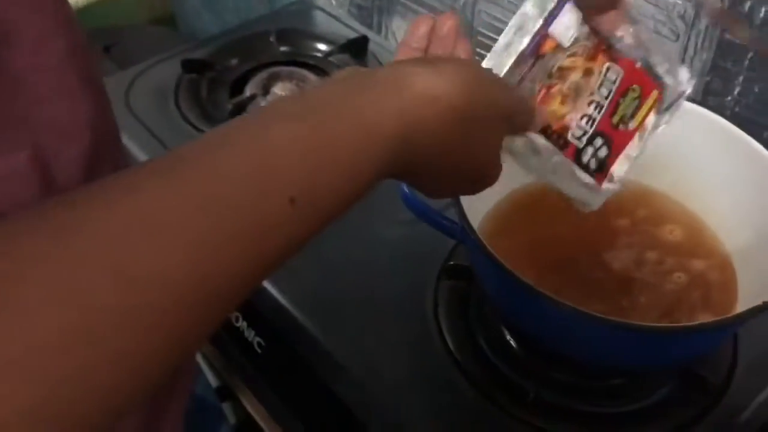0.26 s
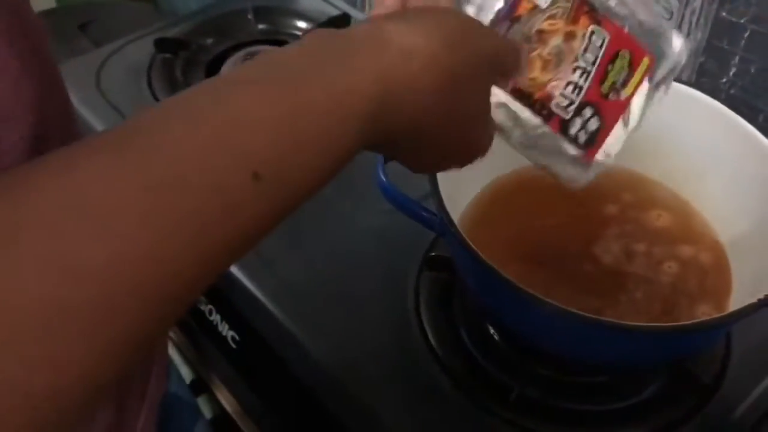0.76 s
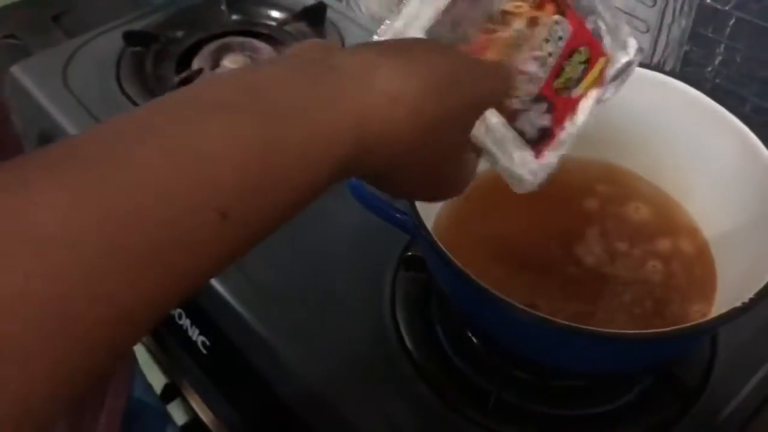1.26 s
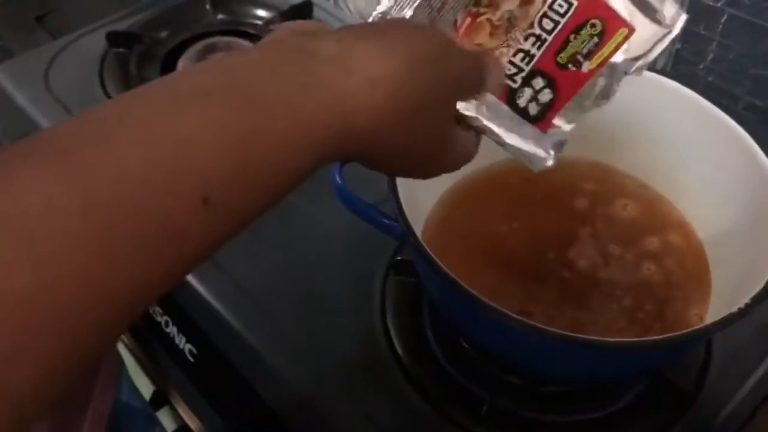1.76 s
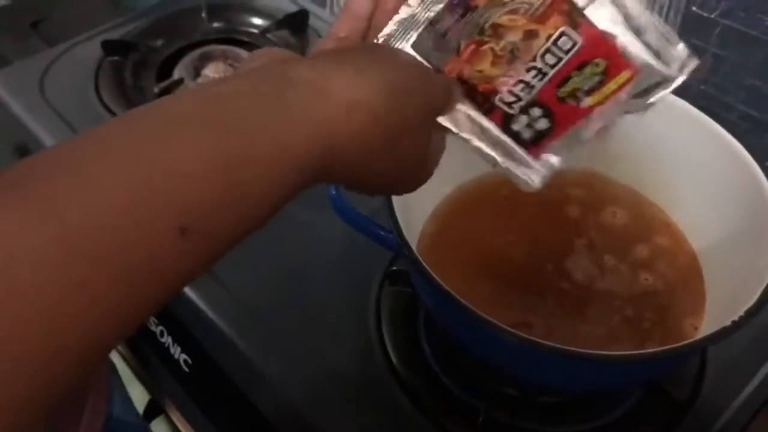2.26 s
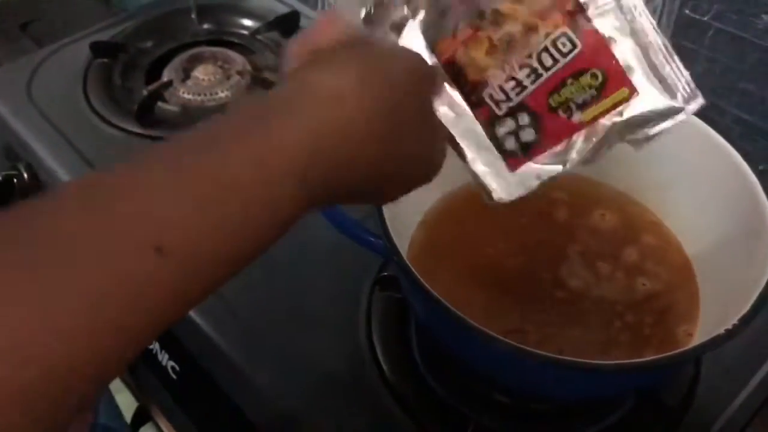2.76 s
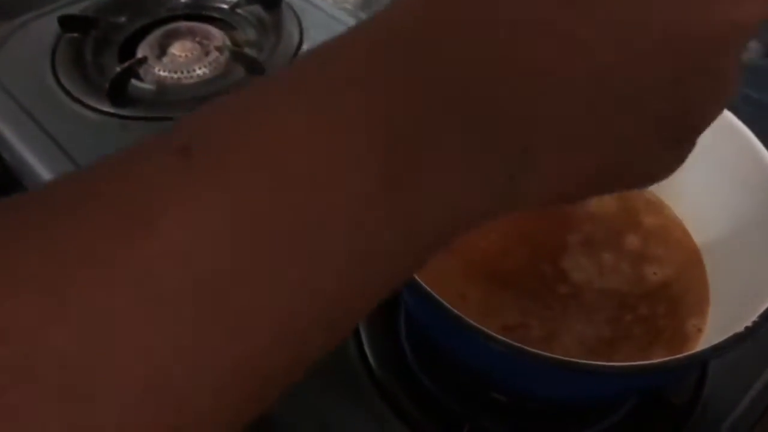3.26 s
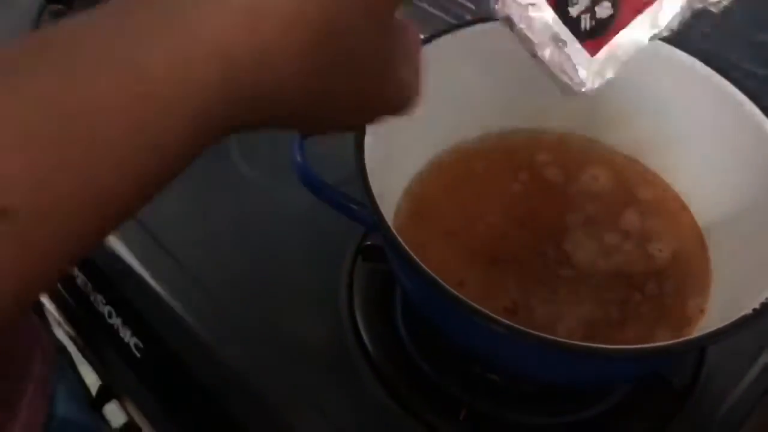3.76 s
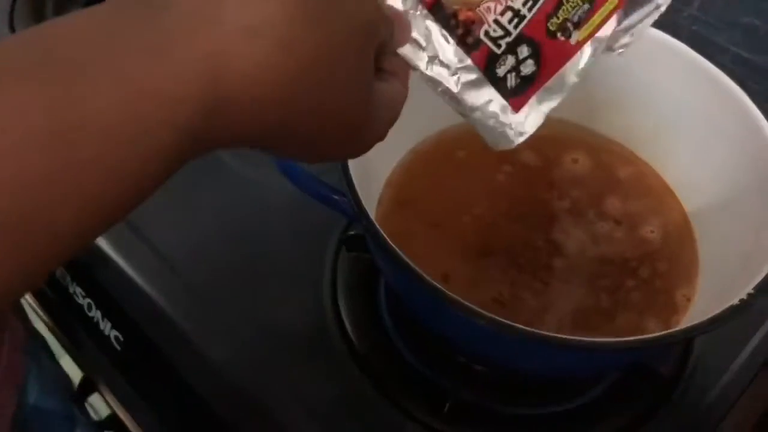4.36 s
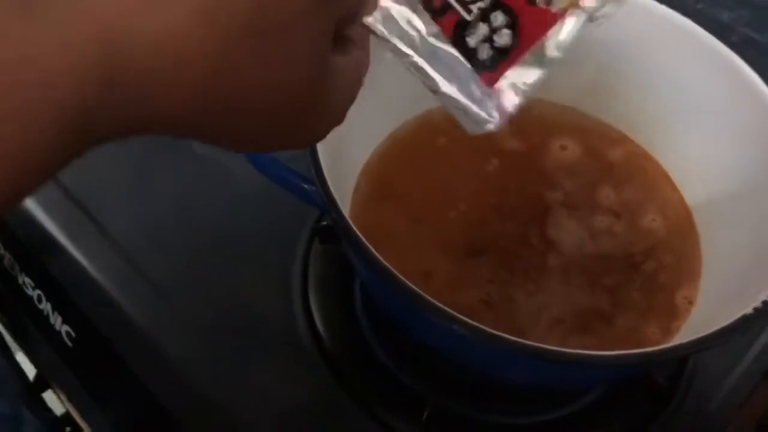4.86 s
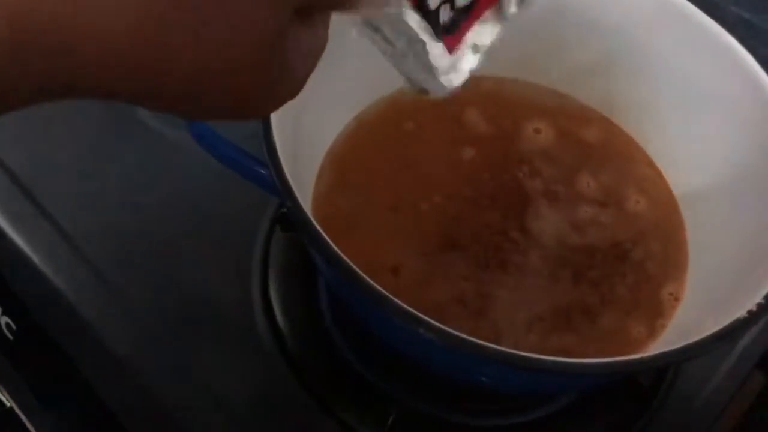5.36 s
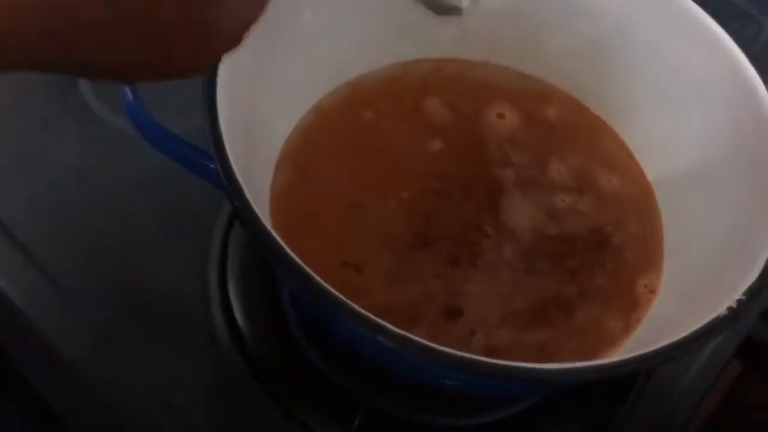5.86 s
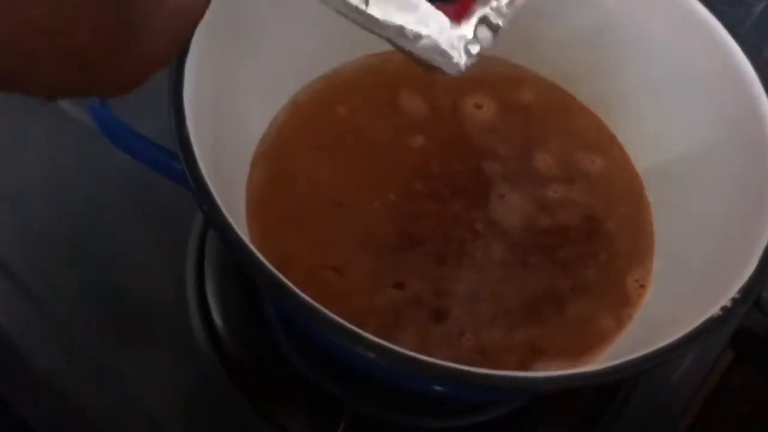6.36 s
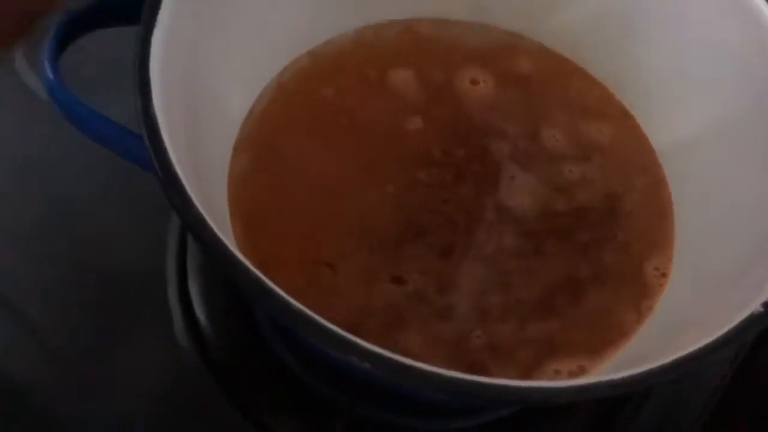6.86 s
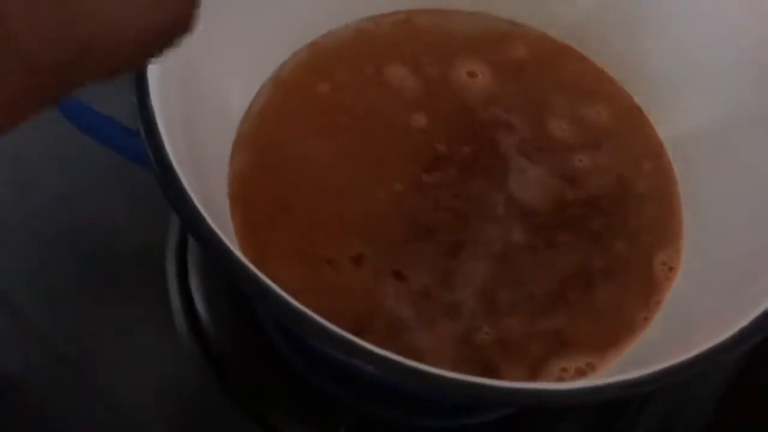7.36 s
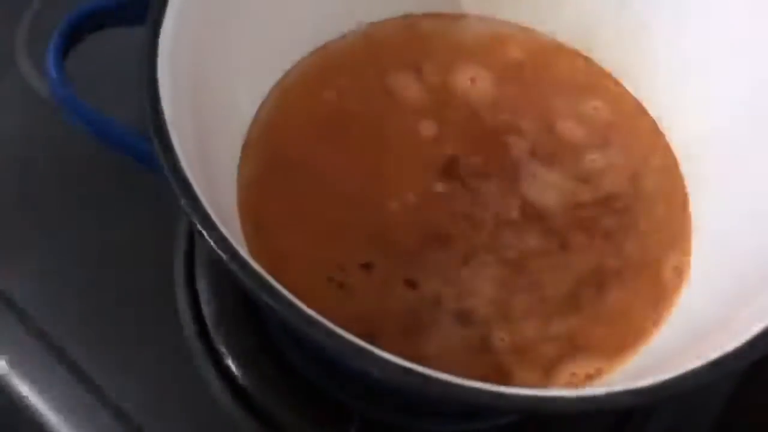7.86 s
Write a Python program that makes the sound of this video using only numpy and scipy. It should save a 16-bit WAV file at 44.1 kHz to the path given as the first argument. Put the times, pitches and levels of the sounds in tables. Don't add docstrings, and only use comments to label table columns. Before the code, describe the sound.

Bright, dry foil crinkles begin at once: clustered creases, separate ticks and fine rustle, with small puffs of trapped air. After a short thinner patch the packet is shaken and squeezed harder, making dense crackles, then tapped and flicked with loud snaps before fading to faint rubbing. Steady low fridge hum, a quiet fan that drops back, and a soft swell of moving air fill the small hard-walled kitchen; close phone microphone.

```python
import sys
import numpy as np
from scipy import signal
from scipy.fft import rfft, irfft
from scipy.io import wavfile
from scipy.ndimage import uniform_filter1d

SR = 44100
rng = np.random.default_rng(int(sys.argv[2]) if len(sys.argv) > 2 else 0)


def materialize(psi):
    bounded = np.clip(np.atleast_2d(psi).T, -1, 1)
    quanta = np.round(bounded * 32767).astype(np.int16)
    wavfile.write(sys.argv[1], SR, quanta)


def gain_from_db(level_db):
    decades = np.asarray(level_db, float) / 20
    return 10 ** decades


N = 357651
SPAN = 2048


def colour(x, table, db):
    hz, gain_db = np.transpose(table)
    f = np.arange(len(x) // 2 + 1) * SR / len(x) + 1
    y = irfft(rfft(x) * gain_from_db(np.interp(np.log(f), np.log(hz), gain_db)), len(x))
    return y * gain_from_db(db) / np.std(y)


def walk(rate):
    k = int(SR / rate)
    steps = np.repeat(rng.standard_normal(N // k + 1), k)
    return 2.0 * uniform_filter1d(uniform_filter1d(steps, k), k)[:N]


# (frequency [Hz], density [dB per Hz])
ROOM_AIR = [(25, -20), (50, -3), (130, 3), (250, 2.5), (500, -2), (750, -4), (1100, -12.5), (1800, -19.5),
            (2400, -20.5), (3500, -26), (8000, -31.5), (16000, -58)]
# (frequency [Hz], density [dB per Hz])
POT_WHISTLE = [(350, -3), (600, 12), (750, 8), (900, -26)]


def moving_air():
    t = np.arange(N) / SR
    swell = np.exp(-((t - 5.6) / 1.13) ** 2)
    drift_db = 0.4 * walk(0.7) + 0.8 * walk(6) + 0.97 * swell
    air = gain_from_db(drift_db) * colour(rng.standard_normal(N), ROOM_AIR, -45)
    whistle = colour(rng.standard_normal(N), POT_WHISTLE, -62)
    return air + swell * gain_from_db(3.1 * walk(5.4)) * whistle


# (frequency [Hz], starting level [dB rms], drift [dB per s])
FRIDGE_TONES = [(100, -42, 0), (150, -58, .9), (300, -51, -.35)]


def fridge():
    t = np.arange(N) / SR
    hum = 0
    for hz, db, drift in FRIDGE_TONES:
        hum = hum + gain_from_db(db + drift * t + 0.5 * walk(3.57)) * np.sin(2 * np.pi * hz * t)
    return np.sqrt(2) * hum


# (multiple of the turning rate [1], level [dB rms])
BLADE_TONES = [(6, -63), (7, -66), (8, -59), (10, -62), (11, -67), (16, -63.5)]


def fan():
    t = np.arange(N) / SR
    full_hz, lag_hz, settle_s, start_turn = 37.325, 0.275, 2.0, 0.13
    turn = np.cumsum(full_hz - lag_hz * np.exp(-t / settle_s)) / SR
    fade_db = -5 * np.clip(t - 5.1, 0, 1)
    tones = 0
    for k, db in BLADE_TONES:
        level = gain_from_db(db + 0.68 * walk(4.53) + fade_db)
        tones = tones + level * np.sin(2 * np.pi * (round(k) * turn + start_turn))
    return np.sqrt(2) * tones


def kitchen(x):
    t = np.arange(SR // 2) / SR
    t60_s, level_db = 0.32, -12.5
    tail = 0
    for hz, share in ((1000.0, 1.7), (3300.0, 0.39), (8500.0, 1.28)):
        band = signal.butter(2, (hz / 3.5, hz * 1.47), "band", fs=SR, output="sos")
        echoes = signal.sosfilt(band, rng.standard_normal(len(t)))
        tail = tail + echoes * 10 ** (-3 * t / (t60_s * share))
    tail = tail * (1 - np.exp(-t / 0.00065))
    return signal.fftconvolve(x, tail * gain_from_db(level_db) / np.sqrt(np.sum(tail ** 2)))[:N]


# (frequency [Hz], density [dB per Hz])
FOIL_ALL_ROUND = [(530, -36), (900, 5.5), (1320, 4.5), (1550, 8), (5550, 4), (11300, -19.5), (16000, -52)]


def all_sides(near):
    strength = np.sqrt(np.abs(uniform_filter1d(near ** 2, size=40)))
    return 0.43 * near + 0.5 * strength * colour(rng.standard_normal(N), FOIL_ALL_ROUND, 0)


def rustle(crackle):
    busy = np.abs(uniform_filter1d(np.abs(crackle), size=11000))
    grains = rng.standard_normal(N) ** 3
    return busy * colour(grains, FOIL_ALL_ROUND, -15.5)


def resonance(hz, width):
    f = np.arange(SPAN // 2 + 1) * SR / SPAN + 1
    return 1 / (1 + 1j * (f * f - hz * hz) / (f * width))


def unit_energy(response, push):
    ring = irfft(response * push, SPAN)
    return ring * np.sqrt(SR / 1000 / np.sum(ring ** 2, axis=1, keepdims=True))


def place(s, sounds):
    out = np.zeros(N + SPAN)
    np.add.at(out, (s * SR).astype(int)[:, None] + np.arange(SPAN), sounds)
    return out[:N]


def rings(s, energy_db, hz, length_ms, q):
    columns = np.broadcast_arrays(energy_db, hz, length_ms)
    energy_db, hz, length_ms = (column[:, None] for column in columns)
    age = np.arange(SPAN) * 1000 / SR / length_ms
    gust = rng.standard_normal((len(s), SPAN)) * np.exp(-age) * (1 - np.exp(-age / 0.11))
    knock = unit_energy(resonance(hz, hz / q) ** 2, rfft(gust))
    return place(s, knock * gain_from_db(energy_db))


# (time [s], energy over 1 ms [dB], pitch [Hz])
FURTHER_KNOCKS = [(0.182, -37.5, 1790), (0.855, -36, 807), (1.177, -31, 750), (1.623, -35, 800),
                  (4.493, -40, 950), (4.8935, -34, 1700), (4.983, -31, 700), (5.22, -30, 750),
                  (5.291, -30.5, 750), (5.39, -33, 1900), (5.657, -32, 690), (5.841, -39.5, 1700),
                  (6.165, -27, 480), (6.837, -36, 800), (6.9512, -23.5, 2010), (6.98, -37, 750)]


def thuds():
    return rings(*np.transpose(FURTHER_KNOCKS), length_ms=3.3, q=0.93)


# (time [s], energy over 1 ms [dB], pitch [Hz], length [ms])
SACHET_PUFFS = [
    (0.584, -37, 900, 8),
    (0.998, -23.5, 1470, 2.8),
    (1.160, -27.5, 1150, 13),
    (1.303, -30.5, 1280, 3.3),
    (2.615, -38, 1550, 6.5),
    (2.999, -32.5, 1550, 8.7),
    (4.2015, -27.5, 1070, 4),
    (4.535, -32, 726, 17),
    (6.10, -31, 600, 12),
    (6.55, -32, 825, 14),
]


def puffs():
    return rings(*np.transpose(SACHET_PUFFS), q=1.0)


# (time [s], energy over 1 ms [dB], pitch [Hz])
SINGING_PANELS = [(0.0997, -30, 6410), (0.4831, -32, 4530), (1.1629, -33, 5390), (1.3038, -34, 6300),
                  (1.366, -33, 1590), (1.6328, -30, 6500), (1.8384, -31, 5040), (1.9905, -23.5, 6650),
                  (2.156, -24.5, 3800), (2.414, -31, 3810), (2.4652, -27, 4760), (2.7527, -22.5, 6350),
                  (3.2965, -27.5, 2080), (3.4218, -27, 6830), (4.0518, -29.5, 6300), (4.317, -26.5, 5450),
                  (4.5117, -23, 6300), (4.5206, -27, 6360), (4.6537, -30, 5670), (4.6813, -30, 3200),
                  (4.6929, -28, 6250), (4.8182, -30, 3200), (4.8988, -21.5, 6400), (4.9832, -24, 5360),
                  (5.008, -32, 3040), (5.1303, -31, 4280), (5.1693, -28, 4450), (5.2217, -27.5, 3020),
                  (5.277, -34, 3390), (5.6226, -26.5, 6170), (5.651, -35, 3360), (5.7662, -25.5, 4230),
                  (5.774, -28, 5740), (5.951, -39, 6410), (6.0808, -28, 4280), (6.0976, -31, 7190),
                  (6.163, -18, 7150), (6.3025, -29, 5130), (6.476, -24, 4300), (6.5086, -30, 9060),
                  (6.824, -25, 5440), (6.941, -27, 3070), (6.9517, -26, 4650), (6.9943, -25, 4760),
                  (7.1024, -25, 3500), (0.959, -30, 1580), (2.357, -23.5, 3650), (3.026, -33, 3020)]


def panels():
    return rings(*np.transpose(SINGING_PANELS), length_ms=1.4, q=8.1)


# (frequency [Hz], width [Hz], level [dB])
SACHET_RINGS = [(3120, 590, -3.5), (3720, 110, -5.5)]
# (frequency [Hz], width [Hz], level [dB])
AIR_POCKET = [(1705, 110, 10), (990, 200, -48), (2297, 670, 5.5), (620, 300, -3.5)]


def creases(s, energy_db, centre_hz, pocket_db, cascade_ms):
    columns = np.broadcast_arrays(energy_db, centre_hz, pocket_db, cascade_ms)
    energy_db, centre, pocket_db, cascade_ms = (column[:, None] for column in columns)
    ticks = rng.standard_normal((len(s), SPAN))
    tuning, weight = rng.standard_normal((2, len(s), 6))
    ms = np.arange(SPAN) * 1000 / SR
    length = np.clip(cascade_ms, 0.2, 26)
    rise = 1 - np.exp(-(ms + 1.1) / (0.018 * length ** 2))
    shape = rise * (np.exp(-1.3 * (ms / length) ** 0.67) + 0.64 * np.exp(-ms / 3.3))
    push = np.sign(ticks) * np.abs(ticks) ** 2.7 * shape
    push[:, 3] -= 3.6 * np.sqrt(np.sum(push ** 2, axis=1)) / (1 + length[:, 0] ** 2)
    push = rfft(push)

    sheet = resonance(0.97 * centre, 0.97 * centre)
    for hz, width, db in SACHET_RINGS:
        sheet = sheet + gain_from_db(db) * resonance(hz, width)
    for k in range(6):
        hz = np.clip(centre * np.exp(0.24 * tuning[:, k:k + 1]), 2300, 13000)
        sheet = sheet + 0.54 * weight[:, k:k + 1] * resonance(hz, hz / 5.6)
    sheet = sheet * resonance(0.5 * centre, 1.09 * centre) * resonance(centre, 2.85 * centre)

    squeeze = np.exp(0.06 * weight[:, :1])
    pocket = 0
    for k, (hz, width, db) in enumerate(AIR_POCKET):
        pocket = pocket + (-1) ** k * gain_from_db(db) * resonance(hz * squeeze, width)
    pocket = pocket * resonance(630.0, 4000.0)
    sound = unit_energy(sheet, push) + gain_from_db(pocket_db) * unit_energy(pocket, push)
    return place(s, sound * gain_from_db(energy_db))


# (time [s], energy over 1 ms [dB], length [ms])
SOFT_RUBS = [(0.2133, -35, 2.8), (0.2424, -31.5, 3.2), (0.383, -37, 14), (0.5709, -30, 12),
             (0.781, -33, 14), (0.852, -35, 7.8), (0.8624, -32, 12), (1.084, -35, 13), (1.5157, -38, 5.8),
             (1.5888, -33.5, 5), (2.045, -38, 1.1), (2.503, -36, 2.3), (2.552, -32.5, 2.6),
             (3.119, -34, 30), (3.139, -37, 3.3), (3.9197, -40, 2.4), (4.111, -37, 4), (4.4506, -35, 2),
             (5.1032, -36, 2.2), (5.3308, -34.5, 1.4), (5.5039, -27.5, 0.63), (5.507, -31.5, 6.3),
             (5.5828, -30, 1.4), (6.002, -36, 8), (6.419, -36.5, 3.1), (7.03, -31, 1.8), (7.7147, -39, 21),
             (7.778, -30.5, 13), (8.058, -35.5, 10)]


def rubs():
    s, energy_db, length_ms = np.transpose(SOFT_RUBS)
    return creases(s, energy_db, centre_hz=4170, pocket_db=-4.5, cascade_ms=length_ms)


# (time [s], energy over 1 ms [dB], centre of colour [Hz])
SMALL_PRICKS = [(0.039, -43, 3110), (0.2771, -44.6, 3000), (0.31, -48.5, 3470), (0.3699, -44, 2560),
                (0.3763, -44, 3210), (0.554, -33.5, 3870), (0.6815, -39, 2930), (0.6936, -49, 3110),
                (0.7026, -44, 2520), (1.1411, -45, 3130), (1.1486, -39, 3070), (1.2708, -42, 3530),
                (1.3192, -33, 3710), (1.394, -37, 3870), (1.5781, -51, 3220), (1.829, -34, 4670),
                (2.058, -42, 4320), (2.1467, -32, 5120), (2.2112, -42.3, 4050), (2.301, -36, 4420),
                (2.3973, -37.9, 2950), (2.4773, -33, 4560), (2.6522, -41, 3300), (2.715, -45, 13500),
                (2.74, -44.9, 6390), (2.9728, -38.5, 5450), (3.0604, -34, 5660), (3.1126, -43, 3720),
                (3.3074, -39, 2490), (3.3406, -42.2, 5050), (3.5058, -39, 5610), (3.604, -49, 3320),
                (3.7853, -38, 4860), (4.0726, -38, 4100), (4.3537, -32, 5100), (4.4611, -43, 3480),
                (4.582, -39, 3550), (4.6322, -47, 3020), (4.7215, -36, 4310), (4.751, -39, 3430),
                (4.8184, -36, 3970), (4.828, -36, 3450), (4.9576, -36, 5150), (4.998, -34, 3630),
                (5.266, -36, 2790), (5.401, -29.5, 4750), (5.4275, -39, 3310), (5.5431, -44, 3630),
                (5.7417, -36, 4330), (5.7631, -26, 4290), (5.9943, -35, 3870), (6.02, -33.5, 4460),
                (6.2788, -39, 4120), (6.467, -36, 4050), (6.802, -52, 2830), (6.936, -30, 4090),
                (6.9858, -45, 4000), (7.1084, -34, 3420), (7.1749, -59, 3930), (8.0923, -43, 4030)]


def pricks():
    return creases(*np.transpose(SMALL_PRICKS), pocket_db=-4, cascade_ms=3.6)


# (time [s], energy over 1 ms [dB], centre of colour [Hz])
NEEDLE_TICKS = [(0.1002, -31, 9500), (0.563, -37, 3900), (1.3755, -31, 9500), (1.8727, -34, 5000),
                (2.0442, -32.5, 9500), (2.3485, -38, 4300), (3.1242, -39, 10500), (4.2982, -34, 6000),
                (4.3104, -28.5, 11000), (4.3486, -29, 5000), (4.672, -44, 5500), (5.0527, -30, 10000),
                (5.1038, -31, 10500), (5.583, -33, 9450), (5.784, -29, 4800), (5.922, -27, 9000),
                (5.9735, -43, 7500), (5.706, -35, 4200), (4.224, -38, 5500), (6.8368, -35, 5200)]


def needles():
    return creases(*np.transpose(NEEDLE_TICKS), pocket_db=-18, cascade_ms=1)


# (time [s], peak level [dB])
LONE_TICKS = [(0.0618, -27), (0.182, -31), (1.0607, -31), (1.342, -24), (1.4878, -31), (1.96, -18.5),
              (2.0153, -31), (2.069, -21), (2.1216, -22), (2.384, -24), (2.6607, -23), (3.8082, -18),
              (4.3082, -19.5), (4.347, -26), (4.8817, -17), (4.9571, -36), (4.9684, -21), (5.213, -20),
              (5.38, -21.5), (6.0877, -20), (7.0705, -28), (7.2834, -34), (7.3435, -34.5), (7.5572, -36.5),
              (7.7655, -25.5), (8.084, -35)]


def lone_ticks():
    s, peak_db = np.transpose(LONE_TICKS)
    energy_db = peak_db - 12
    return creases(s, energy_db, centre_hz=4700, pocket_db=-4.5, cascade_ms=4.7)


# (time [s], energy over 1 ms [dB], centre of colour [Hz], pocket share [dB], cascade [ms])
PINCH_SNAPS = [(0.0705, -24.5, 3640, -7, 13), (0.078, -36, 3540, 6, 7.7), (0.0987, -23.5, 5650, -0.5, 3.9),
               (0.2491, -30, 3580, -3, 3.6), (0.258, -34.5, 4580, 4, 7.8), (0.4252, -26.5, 4080, -1.5, 6.9),
               (0.483, -21.5, 5200, -2.5, 2.2), (0.5832, -25.5, 3800, -0.5, 13.5),
               (0.655, -28, 4300, -5, 10), (0.7648, -27, 5140, -8, 1.6), (0.7706, -29, 4830, 0.5, 8.5),
               (0.8388, -30, 4100, 0.5, 10), (0.959, -31.5, 4180, 2.5, 8.1), (0.9692, -27, 4430, -6, 2.3),
               (0.9777, -30, 4070, 2, 8.7), (0.9982, -28.5, 4500, 3, 2), (1.1584, -16, 4740, -6.5, 11),
               (1.1984, -31, 3420, 1, 13), (1.303, -24, 4300, -4.5, 4.1), (1.366, -29, 5050, 3.5, 1.4),
               (1.375, -35, 5430, 1, 2.1), (1.383, -28, 4230, -1.5, 7.3)]
TURN_SNAPS = [(1.617, -29.5, 4030, -15, 0.9), (1.623, -36, 3210.0, -10, 1.8), (1.633, -25.5, 5100, -3, 1.5),
              (1.7078, -23.5, 5800, -7, 1.9), (1.8161, -29.5, 5230, -3, 1.5),
              (1.838, -15.5, 6200, -10, 1.5), (1.8925, -31, 4120, -9, 6), (1.9352, -23, 4500, -11, 1.2),
              (1.9907, -18.5, 7100, -12, 0.53), (2.099, -27, 5730, -6, 1.3), (2.1534, -19, 4700, -7, 6.2),
              (2.2328, -32, 6310.0, -7, 2.2), (2.2394, -24.5, 7100, -7, 0.82), (2.3067, -27, 5900, -7, 1.3),
              (2.343, -27.5, 4130, -4, 16), (2.3563, -31, 4160, -32, 1.5), (2.4135, -23, 4940, -14, 3.2),
              (2.45, -22, 4860, -9, 0.96), (2.466, -34, 4860, -11, 1.4), (2.6371, -32, 4260, 0.5, 1.8),
              (2.675, -27.5, 6000, -2, 2.1), (2.752, -22.5, 7100, -10.5, 1.2),
              (2.781, -33.5, 3520, -15, 2.2)]
FOLD_SNAPS = [(3.0151, -25, 4170, -3.5, 20), (3.0335, -26.5, 5440, -14, 3.9), (3.18, -34, 4270.0, 4, 3.2),
              (3.189, -26, 5500, -6, 8.2), (3.211, -27.5, 5900, -17, 2.6), (3.241, -37, 3970, 5, 3.6),
              (3.2963, -26, 4620, -6, 3.9), (3.3184, -27, 5170, -1.5, 3.3), (3.3918, -32, 4170.0, 7.5, 6.8),
              (3.402, -33, 3520.0, -7, 2.2), (3.422, -22.5, 5660, -1.5, 1.5), (3.425, -22, 6040, -7, 3.2),
              (3.6506, -32, 7200, -6, 2), (3.7651, -27.5, 6400, -2, 1.7), (3.8193, -25, 6400, -12, 1.7),
              (3.8229, -26.5, 5700, -4.5, 4.4), (3.849, -32, 4270, -3.5, 5.9), (3.88, -32, 6150, -1, 3.7),
              (3.9963, -31, 7520.0, -10, 1.9), (4.0375, -31, 5500, 1, 1.2),
              (4.052, -30.5, 6500, -20.4, 2.1), (4.063, -33, 5830.0, -2, 5.6), (4.197, -23, 5440, -10, 10)]
SHAKE_SNAPS = [(4.3176, -24, 5530, -13, 1.8), (4.3235, -25.5, 5650, -14, 1.5),
               (4.3283, -28, 5030, -21, 9.2), (4.3743, -27, 5800, -18, 1.6), (4.4444, -27, 6000, -16, 1.7),
               (4.5118, -29, 5940, -12, 0.92), (4.519, -26, 5500, -7, 3.4), (4.536, -27.5, 4800, -5.5, 1.5),
               (4.5463, -29.5, 3500, -15, 1.3), (4.6546, -30.5, 5300, -4, 1.6),
               (4.6795, -27, 4120, -4, 5.9), (4.6916, -28, 5260, 3, 1.6), (4.708, -26, 4540, -6, 2),
               (4.7364, -27.5, 5300, -7, 2), (4.781, -17.5, 8000, -12.5, 0.93),
               (4.7865, -26.5, 4890.0, -5, 4.4), (4.8138, -27, 4160.0, -15, 3.5),
               (4.839, -30, 4430, -5, 1.2), (4.8626, -26.5, 4500, -11, 0.97),
               (4.8733, -30, 4740.0, -15, 1.6), (4.899, -26.5, 6000, -25, 2.3),
               (4.9812, -19.5, 5560, -9, 5.3), (5.006, -24.0, 4340, -17, 3.5)]
WRING_SNAPS = [(5.0528, -26, 5000, -1.5, 2.2), (5.058, -23, 4470, -11, 1.4), (5.0637, -29, 4400, 4.5, 16),
               (5.084, -27, 5530, -7, 2.5), (5.13, -21.5, 5770, -18, 3), (5.1691, -21.5, 6400, -12, 3.4),
               (5.18, -26.5, 4700, -4, 7.8), (5.2182, -27, 3540, -2, 3.1), (5.2691, -24, 4960.0, -14, 1.6),
               (5.277, -26, 4870, -17, 1.5), (5.281, -22, 4700, -3.5, 7.7), (5.394, -27, 4300, -7, 7.2),
               (5.556, -29, 5130, 3, 1.6), (5.5714, -24.5, 5130, -1.5, 2.2), (5.6233, -24, 5830, -20, 1),
               (5.629, -25, 5570, -4, 1.2), (5.651, -19, 4860, -11, 4.8), (5.7567, -24.5, 4640, -12, 9.8),
               (5.7683, -35, 4900, -23, 0.7), (5.7759, -23.5, 5100, -3, 1.8),
               (5.7826, -40, 5410.0, -12, 1.7)]
TAP_SNAPS = [(5.904, -22, 6350, -20, 1.9), (5.9118, -26, 5460, -4, 4.1), (5.921, -33, 5740, 2.5, 1.6),
             (5.937, -23.5, 7440, -11, 1.7), (5.951, -28, 5440.0, -0.5, 1.3), (5.9616, -22, 6950, -13, 1),
             (6.0573, -26.5, 5530, -6, 7.9), (6.081, -23, 5530, -8, 1.2), (6.0976, -18.5, 6600, -14, 0.85),
             (6.119, -30.5, 6020.0, -6, 13), (6.1641, -13.5, 7340, -8.5, 1.9),
             (6.2965, -31, 6100, -19, 1.4), (6.302, -27, 4860, 2.5, 3.9), (6.3633, -29.5, 4500, -0.5, 5.8),
             (6.3815, -29, 4620.0, -3, 9.9), (6.4763, -16, 5400, -18, 2.5), (6.5077, -18, 5450, -6, 3),
             (6.5502, -17.5, 5300, -5, 9.4), (6.5624, -31, 5400, -16, 5.4)]
FLICK_SNAPS = [(6.81, -31, 5650.0, 1.5, 1.2), (6.8163, -20, 4700, -10, 3), (6.8242, -17.5, 5640, -6, 1.2),
               (6.832, -37, 4630.0, -8, 5.8), (6.941, -28, 3880, -11, 4), (6.9513, -16, 6050, -15, 0.9),
               (6.9788, -30, 4900, -17, 0.8), (6.994, -17, 4900, -2.5, 2.2), (7.096, -28, 3500, -25, 4.5),
               (7.102, -20, 3700, -12, 2.5), (7.12, -29, 3740, -22, 1.7), (7.3891, -29, 3480, -3.5, 1.9)]


def snaps():
    first_moves = PINCH_SNAPS + TURN_SNAPS + FOLD_SNAPS
    clear = np.transpose(first_moves + SHAKE_SNAPS + WRING_SNAPS + TAP_SNAPS + FLICK_SNAPS)
    s, energy_db, centre_hz, pocket_db, _ = np.repeat(clear, 13, axis=1)
    chance = rng.random((4, len(s)))
    when = np.clip(s - 0.012 + 0.09 * chance[0] ** 1.3, 0, (N - 1) / SR)
    size_db = np.minimum(energy_db, -22) - 27 + 6 * chance[1] ** 2
    duller_hz = centre_hz * (0.55 + 0.31 * chance[2])
    crowd = creases(when, size_db, duller_hz, pocket_db, 2.3 + 5.8 * chance[3])
    return creases(*clear) + crowd


def foil():
    crackle = snaps() + lone_ticks() + needles() + pricks() + rubs()
    crackle = crackle + panels() + puffs() + thuds()
    return crackle + rustle(crackle)


def scene():
    near = foil()
    room = moving_air() + fridge() + fan()
    return (near + kitchen(all_sides(near)) + room)[None, :]


def band_limit(x):
    return signal.sosfilt(signal.butter(12, 16990, fs=SR, output="sos"), x)


def record(dry):
    hissy = dry + gain_from_db(-70) * rng.standard_normal(dry.shape)
    shelf = signal.ellip(8, 0.3, 23, 15800, fs=SR, output="sos")
    wall = signal.ellip(10, 0.3, 60, 16950, fs=SR, output="sos")
    mix = signal.sosfilt(wall, signal.sosfilt(shelf, hissy))
    return band_limit(mix)


dry = scene()
out = record(dry)
materialize(out)
```